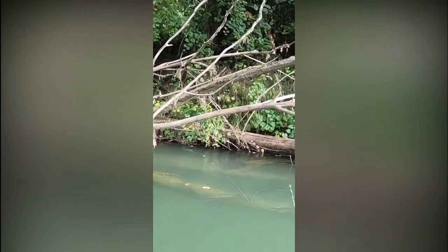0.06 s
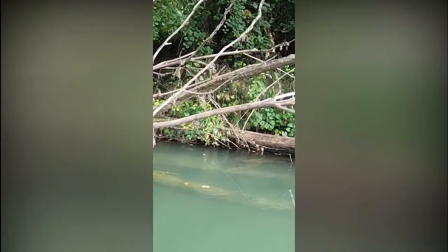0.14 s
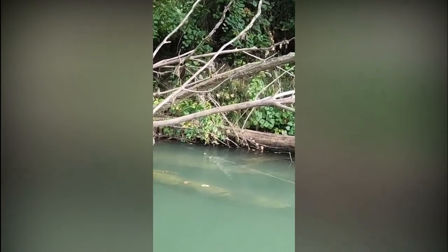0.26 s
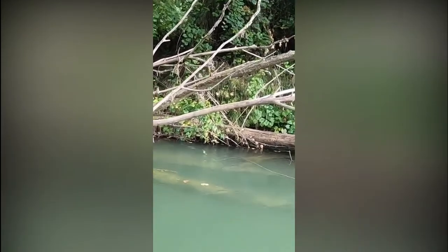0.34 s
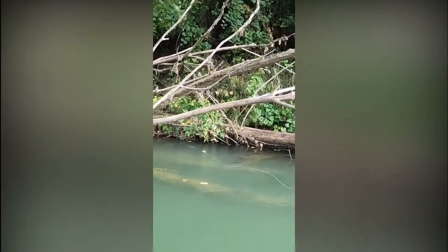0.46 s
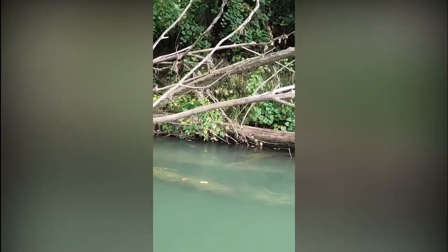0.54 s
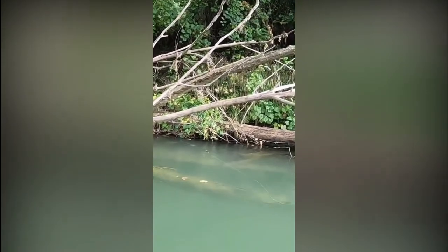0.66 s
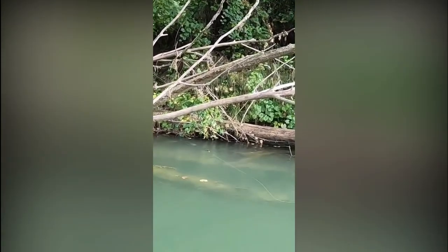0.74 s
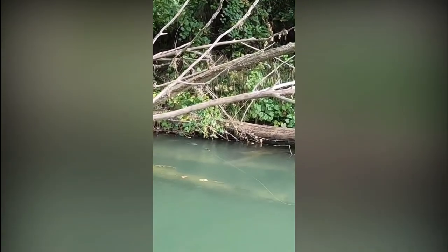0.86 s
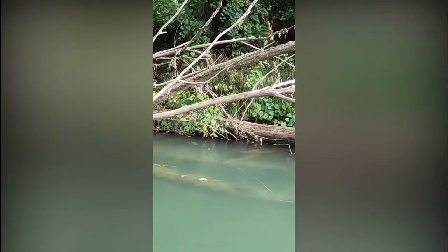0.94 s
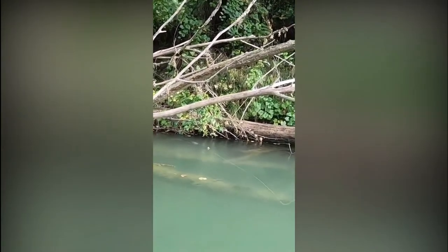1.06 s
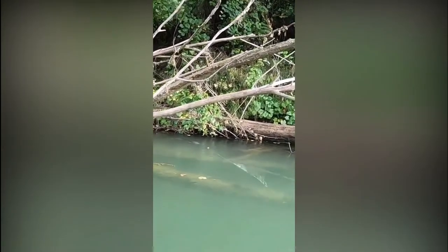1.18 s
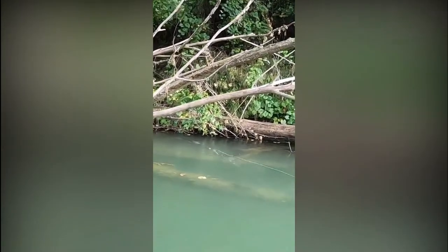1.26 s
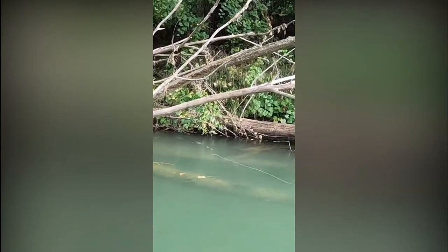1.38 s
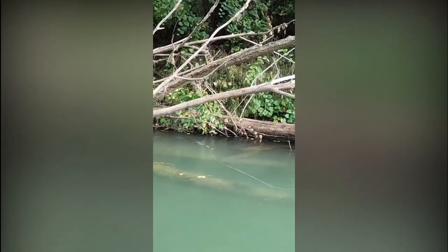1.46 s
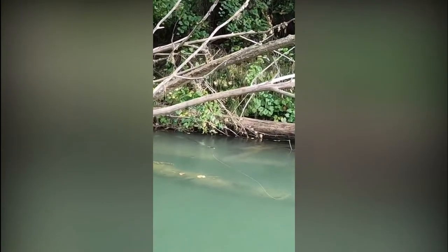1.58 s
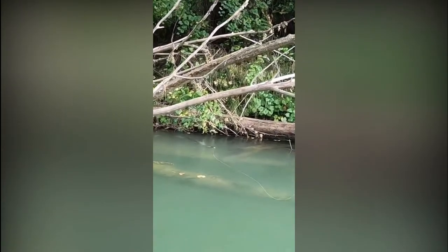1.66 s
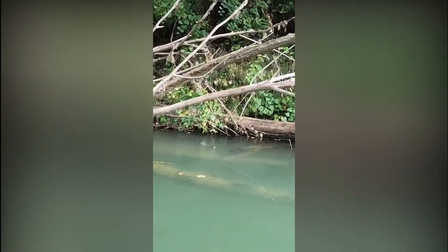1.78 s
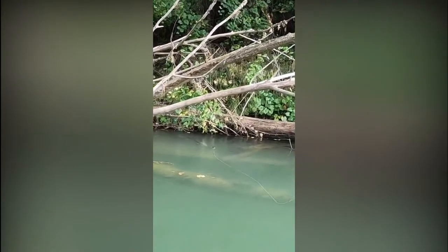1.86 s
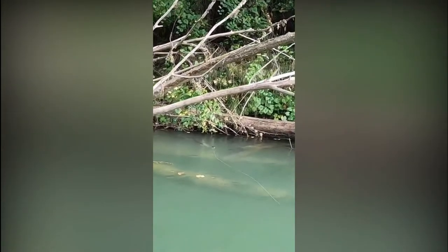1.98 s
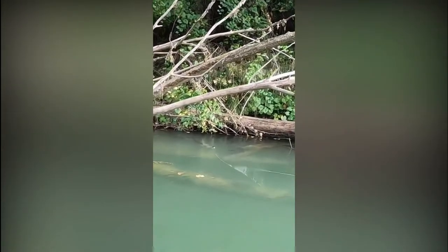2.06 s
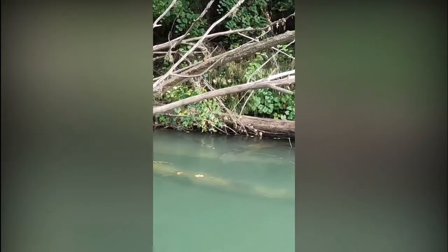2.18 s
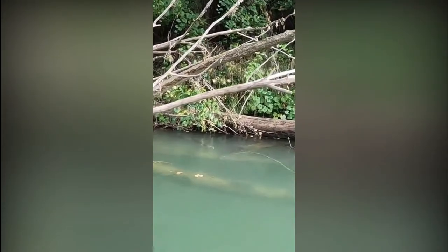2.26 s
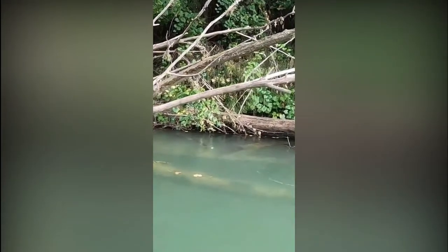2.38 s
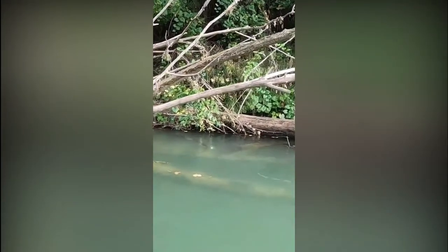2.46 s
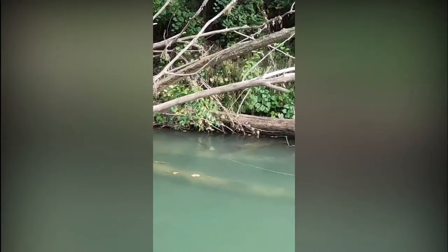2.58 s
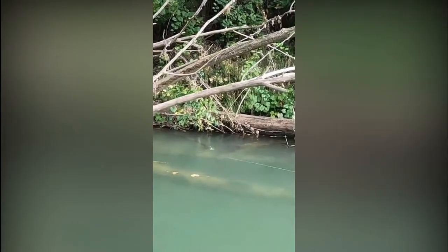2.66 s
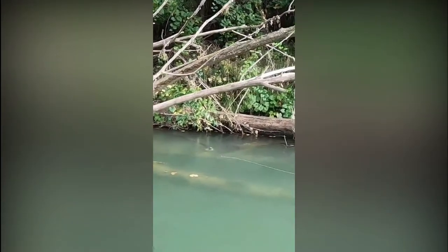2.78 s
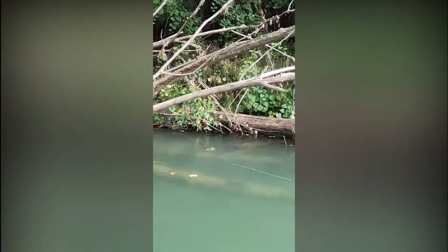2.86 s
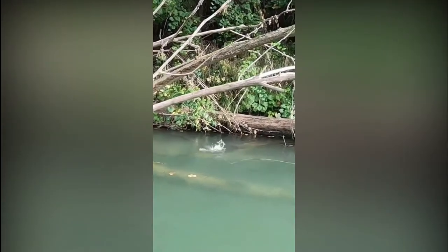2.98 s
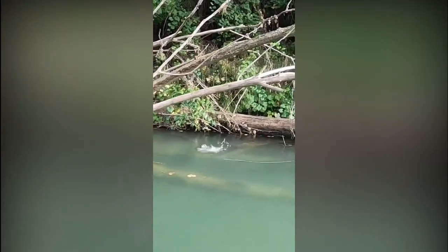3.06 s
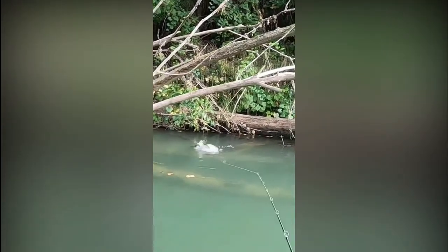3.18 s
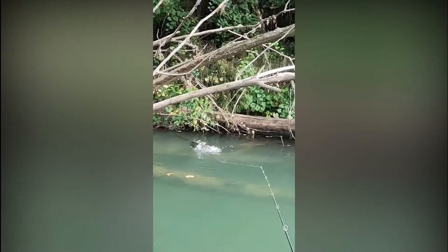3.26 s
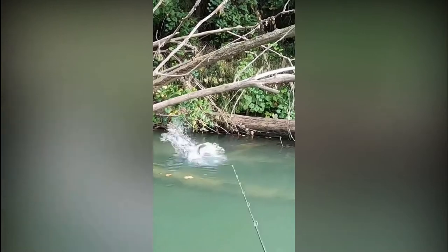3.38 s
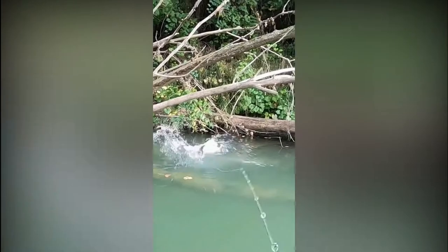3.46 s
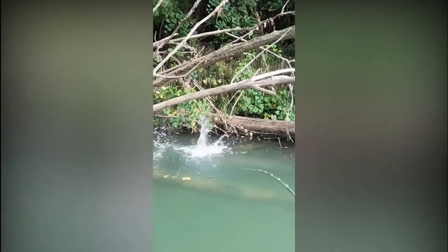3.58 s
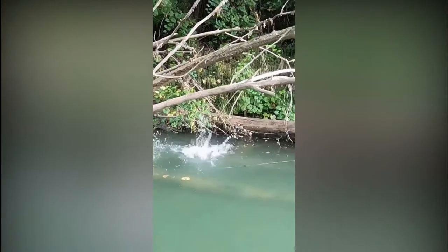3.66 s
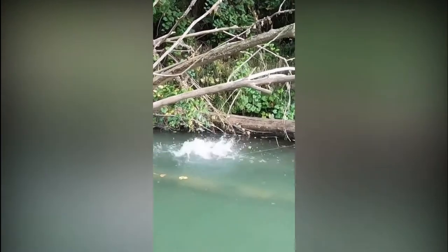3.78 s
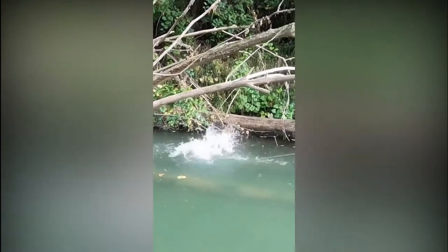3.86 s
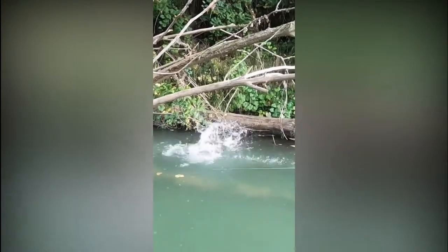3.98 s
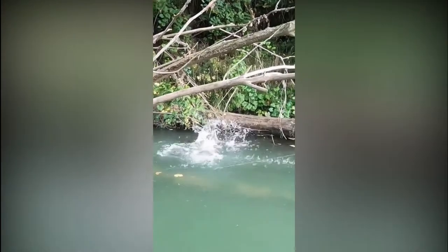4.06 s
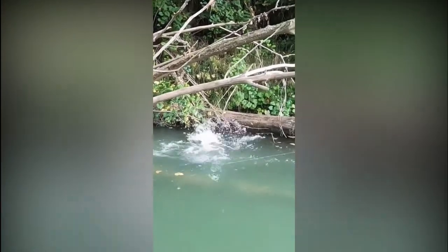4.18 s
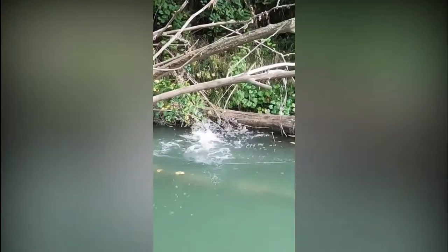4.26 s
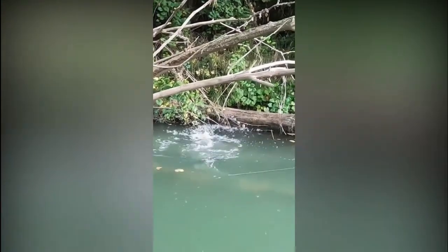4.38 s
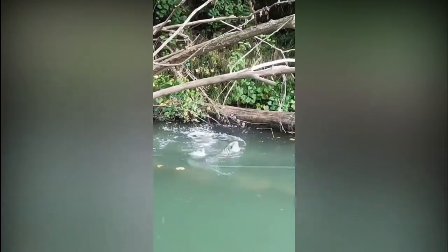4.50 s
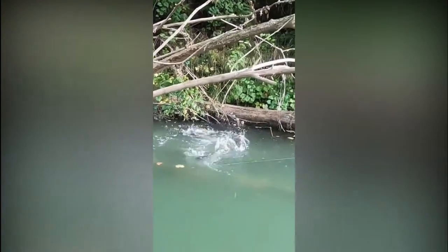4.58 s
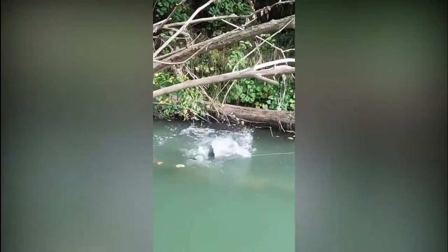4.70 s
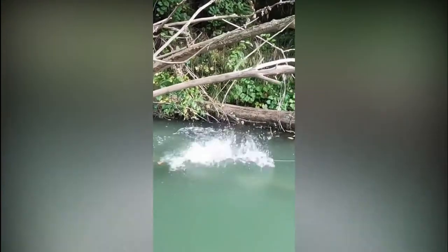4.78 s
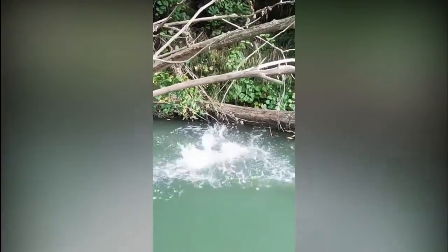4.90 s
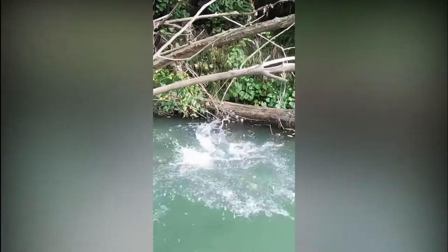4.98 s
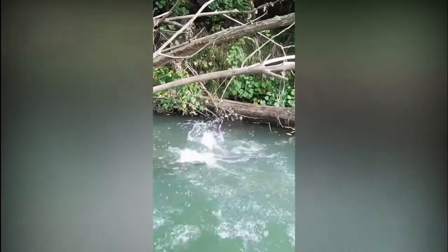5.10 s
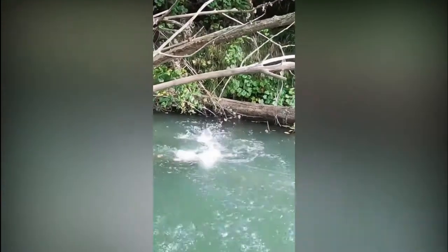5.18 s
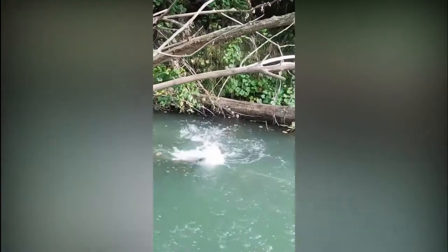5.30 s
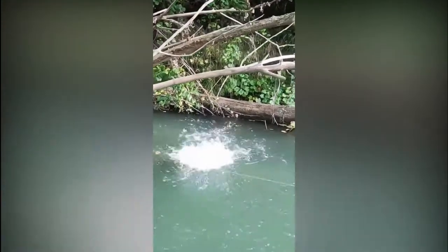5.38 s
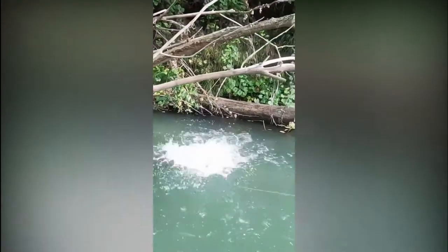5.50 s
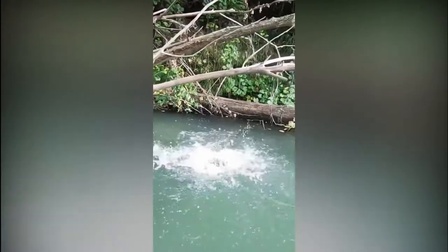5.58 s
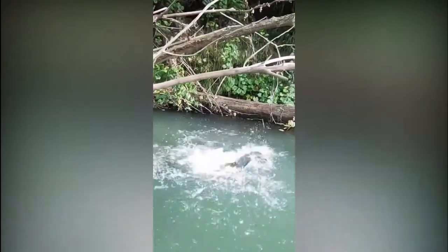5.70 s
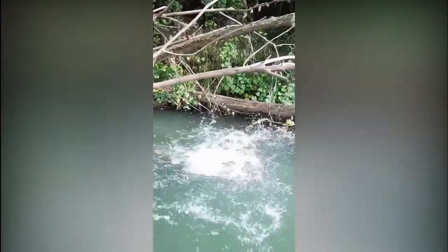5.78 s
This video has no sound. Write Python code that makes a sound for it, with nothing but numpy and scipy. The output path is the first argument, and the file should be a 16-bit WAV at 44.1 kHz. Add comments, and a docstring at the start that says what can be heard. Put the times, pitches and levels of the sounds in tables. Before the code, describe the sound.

A hushed riverbank with small ticks and plops suddenly gives way to a fish thrashing, slapping and churning bubbly water until the end.

```python
"""A quiet river bank: steady river noise; tackle clicks and rustles, a bird whistles thinly (gliding sines),
the water swirls (filtered noise) and plops (short ringing tones).
At 3.08 s a hooked fish breaks the surface and thrashes: tail slaps are noise bursts, air gulps and groans
as gliding tones, bubbles churn and spray patters as clouds of damped resonances.
Puffs of low noise buffet the microphone; short echoes come from the bank."""
import sys
import numpy as np
from scipy import signal
from scipy.fft import rfft, irfft, next_fast_len
from scipy.io import wavfile
from scipy.ndimage import uniform_filter1d

SR = 44100
rng = np.random.default_rng(int(sys.argv[2]) if len(sys.argv) > 2 else 0)


def pcm_store(signal):
    """Save signal as 16-bit PCM."""
    levels = np.round(np.clip(np.atleast_2d(signal), -1, 1) * 32767)
    wavfile.write(sys.argv[1], SR, levels.astype(np.int16).T)


N = 257314
TIME = np.arange(N) / SR
PADDED = next_fast_len(N, real=True)
BINS_HZ = np.maximum(np.arange(PADDED // 2 + 1) * SR / PADDED, 1)
SURFACE_S, LEAP_S = 3.076, 3.56   # fish breaks the surface and rolls; then leaps


def from_db(db):
    """Decibels to gain."""
    return 10 ** (np.asarray(db) / 20)


def rms_one(x):
    """Scale to unit power."""
    return x / np.sqrt(np.mean(x ** 2) + 1e-20)


def in_time(rows):
    """One curve per column, joined by straight lines."""
    s, *columns = np.transpose(rows)
    return [np.interp(TIME, s, c) for c in columns]


def at_hz(points, hz):
    """Read a table on a log-frequency axis."""
    f, value = np.transpose(points)
    return np.interp(np.log(hz), np.log(f), value)


def cut(x, hz, kind, order=2):
    """Butterworth filter."""
    edges_hz = np.clip(hz, 10, .45 * SR)
    return signal.sosfilt(signal.butter(order, edges_hz, kind, fs=SR, output="sos"), x + 1e-18)


def drift(rate_hz):
    """Slow random curve of spread 1: noise through a double pole, drawn every 40 samples."""
    step = 40
    pole = np.exp(-2 * np.pi * rate_hz * step / SR)
    white = rng.standard_normal(N // step + 2002)
    slow = signal.lfilter([1], [1, -2 * pole, pole ** 2], white)[2000:]   # drop the settling
    return np.interp(np.arange(N) / step, np.arange(len(slow)), rms_one(slow))


def pan(left_minus_right_db):
    """Channel gains for a left minus right level."""
    return from_db(np.array([[.5], [-.5]]) * left_minus_right_db)


def noise(colour, likeness):
    """Stereo noise with a given spectrum and left-right likeness (-1..1)."""
    mid, side = rfft(rng.standard_normal((2, PADDED)))
    c = np.clip(likeness, -1, 1)
    both = np.sqrt(1 + c) * mid + np.sqrt(1 - c) * side * [[1], [-1]]
    return rms_one(irfft(both * from_db(at_hz(colour, BINS_HZ)), PADDED)[:, :N])


def burst(t, swell_s, decay_s):
    """Exponential envelope that swells up to t = 0 and dies away."""
    return np.exp(-np.minimum(np.maximum(-t / swell_s, t / decay_s), 40))


def surges(rows, bed_db=-120, lag_s=0):
    """Gain of rounded swells (t/s, level/dB, length/s) over a bed; their powers add."""
    rise_share = 0.64   # rise time over fall time
    power = from_db(bed_db) ** 2
    for s, db, length_s in rows:
        age = (TIME - s - lag_s) / length_s
        age = np.where(age < 0, age / rise_share, age)
        power = power + from_db(db) ** 2 * np.exp(-2 * np.minimum(age ** 2, 20))
    return np.sqrt(power)


def glide(track, waver, flutter_db, rate_hz):
    """A sine along a (t/s, f/Hz, level/dB) track, wavering in pitch and level."""
    hz, db = in_time(track)
    inside = (TIME > track[0][0]) & (TIME < track[-1][0])
    gate = uniform_filter1d(1. * inside, size=300)
    phase = 2 * np.pi * np.cumsum(hz * (1 + waver * drift(rate_hz))) / SR
    gain = from_db(db + flutter_db * drift(rate_hz))
    return np.sqrt(2) * gate * gain * np.sin(phase)


# river spectrum: f/Hz, density/(dB per Hz)
RIVER_COLOUR = [(15, -28), (25, -12.5), (59, -4.5), (116, -21.5), (136, -1), (188, 2), (221, -2.5),
                (399, -11.5), (482, -14.5), (684, -6.5), (804, -3.5), (1080, -9.5), (1300, -6.5),
                (2630, -22.5), (15500, -38.5)]
# left-right likeness of the far river: f/Hz, likeness/(-1..1)
RIVER_LIKENESS = [(60, 0.54), (130, 0.093), (290, 0.12), (640, -0.48), (1400, -0.34), (3100, .2),
                  (7000, -0.24)]


def river():
    """Far flowing water: wide coloured noise, nearly steady in level."""
    level_db = -59.5 + .5 * drift(2.0)
    return from_db(level_db) * noise(RIVER_COLOUR, at_hz(RIVER_LIKENESS, BINS_HZ)) * pan(-0.984)


# rumble of air on the microphone: f/Hz, density/(dB per Hz)
WIND_COLOUR = [(20, 6), (45, 6.5), (70, -3), (130, -32.5)]
# puffs of air during the fight: t/s, level/dB
PUFFS = [(3.125, -57), (3.82, -45), (3.94, -40.5), (4.465, -44), (4.72, -52), (4.98, -45), (5.15, -46),
         (5.28, -43), (5.76, -37)]


def wind():
    """Air buffets the microphone as low noise: short puffs, over a bed once the fish has leapt."""
    puff_s, breeze_db = 0.065, -54
    bed_db = np.where(TIME > LEAP_S, breeze_db, -120)
    puffs = surges([(s, db, puff_s) for s, db in PUFFS], bed_db)
    return puffs * noise(WIND_COLOUR, 0.23) * pan(-2.5)


# thin whistles, one track each: t/s, f/Hz, relative level/dB
BIRD = [
    [(.19, 5470, -77), (.3, 5540, -84), (.39, 5520, -86)],
    [(.65, 7330, -81), (.70, 7030, -70), (.80, 6900, -67), (1.05, 6780, -69.5), (1.16, 6600, -65.5),
     (1.21, 6630, -78), (1.36, 6680, -86)],
    [(1.31, 4040, -71), (1.37, 4450, -76), (1.44, 4450, -72), (1.50, 4120, -84), (1.59, 4430, -86)],
    [(2.10, 4260, -83), (2.19, 4330, -73), (2.25, 4340, -77)],
]


def bird():
    """Thin whistles: single sines that glide and flutter."""
    whistles = sum(glide(track, waver=0.0083, flutter_db=6.5, rate_hz=113) for track in BIRD)
    return from_db(-9.0) * whistles * pan(-8.0)


# swirl spectrum: f/Hz, density/(dB per Hz)
SWIRL_COLOUR = [(200, -18), (400, -4.5), (560, -2), (900, -11), (1350, -1.5), (2200, -9), (5000, -38)]
# soft swirls before the strike: t/s, level/dB, length/s
SWIRLS = [(1.36, -61, 0.23), (2.26, -61, 0.094)]


def swirls():
    """Turning water: coloured noise in rounded swells with a fluttering level."""
    return surges(SWIRLS) * from_db(2 * drift(42)) * noise(SWIRL_COLOUR, 0.31) * pan(-1.3)


# dry ticks of tackle and falling drops: t/s, level/dB, decay/s
CLICKS = [(0.0158, -19.5, 0.0048), (0.128, -46.5, 0.008), (0.403, -66, 0.0027), (0.452, -52, 0.0018),
          (0.475, -54, 0.001), (1.0157, -51, 0.0023)]
# click spectrum: f/Hz, density/(dB per Hz)
CLICK_COLOUR = [(80, -47.5), (150, -31), (360, -7), (520, -5), (720, 6), (950, -13.5), (1400, 0.5),
                (1850, -2), (2050, 13.5), (2250, 8.5), (2550, -2), (4400, -2.5), (5300, 4), (6400, 6.5),
                (7600, 3), (9000, -5), (11000, -20), (15000, -34)]
# rod twitches, each a soft rustle: t/s, level/dB, length/s
TWITCHES = [(.055, -52, 0.077), (.47, -62, 0.12), (1.41, -58, 0.049), (2.275, -61.5, 0.08)]
# rustle spectrum: f/Hz, density/(dB per Hz)
RUSTLE_COLOUR = [(240, -24), (400, -8.5), (854, -4.5), (1290, -13), (2150, -6.5), (2830, -9), (5430, -9),
                 (7810, -14), (15000, -43)]


def tackle():
    """Close on the right: clicks are abrupt noise bursts, rod twitches are rustling noise swells."""
    handling_db = -73   # faint rustle between twitches
    click_gain = sum(from_db(db) * burst(TIME - s, 0.000128, decay_s) for s, db, decay_s in CLICKS)
    clicks = click_gain * noise(CLICK_COLOUR, 0.17)
    rustle_gain = surges(TWITCHES, handling_db) * from_db(2.3 * drift(110))
    rustle = rustle_gain * noise(RUSTLE_COLOUR, 0.33)
    return clicks * pan(-12.5) + rustle * pan(-3.5)


# air cavities opening and closing, one track each: t/s, f/Hz, level/dB
CAVITIES = [
    [(1.485, 528, -56), (1.5, 783, -45.5), (1.522, 1270, -62)],
    [(3.105, 130.2, -29), (3.116, 96, -33), (3.14, 117, -38), (3.18, 103, -47), (3.22, 133, -53),
     (3.252, 240, -40), (3.272, 433, -46), (3.29, 366, -55)],
    [(3.29, 141.9, -44), (3.33, 162, -52), (3.38, 187, -51), (3.41, 258, -61)],
    [(3.79, 70, -52), (3.825, 79, -48), (3.86, 75, -54)],
    [(4.105, 403, -32), (4.125, 270, -46), (4.15, 247, -38), (4.175, 320, -47), (4.19, 470, -33)],
    [(4.26, 169.6, -47), (4.29, 124, -45), (4.33, 114, -54)],
    [(5.245, 92, -38), (5.27, 77.5, -40), (5.29, 89, -36.5), (5.34, 69, -48)],
    [(5.37, 84.3, -54), (5.40, 117, -34.5), (5.42, 140, -38)],
]


def cavities():
    """Air cavities groan or chirp: the pitch glides as they open and close."""
    return sum(glide(track, waver=.05, flutter_db=1.5, rate_hz=50) for track in CAVITIES)


# loudest single bubbles and drips: t/s, f/Hz, peak level/dB, time to peak/s
GULPS = [(.128, 625, -45, 0.0019), (.508, 2180, -54, 0.005), (.734, 1150, -53, 0.0013),
         (1.0163, 4460, -41.5, 0.00075), (1.0348, 1166, -38.5, 0.0017), (1.0345, 447, -47.5, 0.0009),
         (1.0585, 3440, -43, 0.00072), (2.238, 590, -55, 0.0052), (2.309, 576, -51, .003),
         (2.379, 2080, -54, 0.0018), (3.05, 196, -47, 0.0093), (3.0885, 885, -18, 0.00071),
         (3.100, 238, -26.5, 0.0032), (3.191, 577, -26.5, .0025), (3.210, 954, -32, 0.004),
         (3.255, 3570, -23, 0.00088), (3.274, 767, -31, 0.0036), (3.292, 398, -33.5, 0.0041),
         (3.3995, 5800, -35.5, 0.001), (3.433, 724, -28, 0.0023), (3.532, 224, -42.5, 0.011),
         (3.5625, 650, -20, 0.0011), (3.688, 893, -22.5, 0.0023), (3.698, 950, -26, 0.0024),
         (3.758, 740, -29.5, 0.0041), (3.89, 558, -20.5, .003), (3.9362, 960, -9.5, 0.00073),
         (3.938, 261, -24, 0.0039), (4.11, 882, -23.5, 0.0025), (4.227, 442, -22.5, 0.0038),
         (4.256, 226.5, -26, 0.0051), (4.457, 590, -22, 0.0007), (4.460, 205, -18, 0.0038),
         (4.791, 986, -21, 0.001), (4.841, 620, -30.5, 0.0018), (4.956, 620, -13.5, 0.0031),
         (5.003, 980, -23.5, 0.006), (5.443, 720, -26, 0.0024), (5.481, 296, -21.5, 0.004),
         (5.496, 400, -20.5, 0.0027), (5.601, 4020, -23, 0.0026), (5.659, 740, -24, 0.002),
         (5.703, 705, -24, 0.003), (5.706, 183, -28, 0.011)]
# small bubbles rise in pitch, large pockets sink: f/Hz, glide/octaves
GULP_GLIDE = [(200, -0.63), (450, -0.11), (700, 0.089)]


def gulps():
    """Trapped air rings as a short tone that glides while the bubble changes shape and depth."""
    roughness = 0.115   # rms share of pitch
    out, t = np.zeros(N), np.arange(SR // 8) / SR
    for s, hz, db, peak_s in GULPS:
        age = t / peak_s
        wobble = rms_one(cut(rng.standard_normal(len(t)), hz / 4, "low"))
        bend = 2 ** (at_hz(GULP_GLIDE, hz) * np.tanh(age / 4))
        pitch_hz = hz * bend * (1 + roughness * wobble)
        envelope = age * np.exp(1 - age)
        tone = from_db(db) * envelope * np.sin(2 * np.pi * np.cumsum(pitch_hz) / SR)
        i = int(s * SR)
        out[i:i + len(t)] += tone[:N - i]
    return out


# stereo width of slaps and bubbles: f/Hz, spread/(0..1)
SPREAD = [(100, 0.38), (330, 0.061), (700, 0.23), (1400, 0.51), (3100, 0.052), (7000, 0.49), (14000, 0.28)]
# slap spectrum: f/Hz, density/(dB per Hz)
SLAP_COLOUR = [(150, -29), (500, -6), (1000, 2), (1600, -2), (2700, 4.5), (5000, -2.5), (7800, -4),
               (11000, -23.5), (15000, -27)]
# water sheets hit by tail and body: t/s, level/dB, swell/s, decay/s
SLAPS = [(3.089, -25.5, .00065, 0.0033), (3.104, -25.5, .0099, 0.0068), (3.196, -30.5, 0.0041, .021),
         (3.2763, -33, .001, 0.0061), (3.565, -36, 0.031, .0048), (3.592, -18, 0.0099, 0.0079),
         (3.819, -31, 0.0021, 0.005), (3.9322, -22, 0.00051, 0.0013), (3.937, -12.5, 0.00069, 0.0018),
         (4.133, -26.5, .001, 0.0019), (4.237, -30, 0.019, 0.023), (4.5596, -17.5, 0.00046, 0.0013),
         (4.566, -26, .0012, .0017), (4.843, -28.5, 0.0032, 0.0065), (4.915, -29, .0086, 0.012),
         (4.959, -31, 0.037, 0.036), (5.017, -29.5, 0.0072, 0.029), (5.487, -28, 0.0034, 0.052),
         (5.601, -28.5, 0.006, 0.017), (5.712, -35, .0073, 0.019), (5.742, -24, 0.00044, 0.0021),
         (5.753, -19.5, 0.0095, 0.0063)]


def slaps():
    """A sheet of water tears into a dense crackle of noise; harder blows are brighter."""
    bright_hz, usual_db, db_per_octave = 3970, -29, 5.5   # low-pass corner at the usual level
    out = np.zeros((2, N))
    crackle = noise(SLAP_COLOUR, np.cos(np.pi * at_hz(SPREAD, BINS_HZ) / 2))
    for s, db, swell_s, decay_s in SLAPS:
        corner_hz = bright_hz * 2 ** ((db - usual_db) / db_per_octave)
        span = slice(int((s - .1) * SR), int((s + .2) * SR))
        sheet = rms_one(cut(crackle[:, span], corner_hz, "low", order=1))
        out[:, span] += from_db(db) * burst(TIME[span] - s, swell_s, decay_s) * sheet
    return out * (TIME > SURFACE_S)


# colour of the bubbling water: f/Hz, density/(dB per Hz)
WATER = [(41, -36), (70, -6), (108, -30), (161, 0), (278, 3.5), (333, -12.5), (427, -1.5), (572, -4.5),
         (1010, -4.5), (1620, -6), (2220, 0), (3490, -4), (7350, -12), (13500, -34), (15500, -50)]


def grains(low_hz, high_hz, per_s, cycles, size_db, clump_db, count):
    """Bubbles of many sizes born at random and in clumps; each rings from its own place.

    per_s: births before clumping, all bands; cycles: ring length to -60 dB; count: pitch bands.
    """
    first = int(SURFACE_S * SR)
    out = np.zeros((2, N - first))
    birth_chance = per_s / count / SR * from_db(clump_db * drift(35)[first:])
    for hz in np.geomspace(low_hz, high_hz, count):
        at = np.flatnonzero(rng.random(N - first) < birth_chance)
        size, side, sign = rng.random((3, len(at)))
        height = from_db(size_db * np.minimum(-np.log(size), 4)) * np.sign(sign - .5)
        turn = (side - .5) * np.pi * at_hz(SPREAD, hz)   # path difference as a phase angle
        births = np.full(out.shape, 1e-18, complex)
        births[:, at] = height * np.exp(1j * turn * np.array([[1], [-1]]))
        pole = from_db(-60 * hz / (cycles * SR)) * np.exp(2j * np.pi * hz / SR)
        rings = signal.lfilter([1], [1, -pole], births).imag
        rings = cut(rings, [hz / 2, hz * np.sqrt(2)], "band", order=1)
        out += rms_one(rings) * from_db(at_hz(WATER, hz)) * np.sqrt(hz)   # bandwidth grows with pitch
    return np.pad(rms_one(out), [(0, 0), (first, 0)])


# how hard the fish churns, which drives the spray: t/s, effort/dB
EFFORT = [(3.08, -29.5), (3.11, -30.5), (3.16, -37), (3.3, -39), (3.39, -43.5), (3.52, -39.5),
          (3.62, -37.5), (3.8, -36.5), (4.1, -35.5), (4.31, -38.5), (4.55, -34.5), (4.67, -37.5),
          (4.82, -38), (4.98, -33), (5.17, -31), (5.42, -36.5), (5.66, -34.5), (5.79, -32.5)]
# body strokes that drag air under: t/s, bubble level/dB, large pocket level/dB, length/s
STROKES = [(3.106, -32, -50, 0.01), (3.2, -46, -44, 0.017), (3.283, -34.5, -46, 0.016),
           (3.435, -31, -41.5, 0.014), (3.481, -34, -69, 0.034), (3.563, -34, -43, 0.051),
           (3.678, -37, -67, 0.062), (3.848, -34.5, -53, 0.1), (3.94, -36, -31, 0.034),
           (4.101, -35.5, -51, 0.024), (4.228, -33, -40.5, 0.032), (4.496, -69, -37, 0.018),
           (4.53, -42, -44, 0.025), (4.882, -35, -67, 0.025), (4.993, -28.5, -48, 0.08),
           (5.095, -32, -36.5, 0.069), (5.215, -35.5, -41, 0.07), (5.385, -37, -40.5, 0.06),
           (5.477, -28.5, -30.5, 0.037), (5.587, -32.5, -45, 0.13), (5.733, -29.5, -33.5, 0.11)]


def churn():
    """Strokes set bubbles popping and large pockets burbling; spray and ringing drops follow the effort."""
    usual_db = -36   # ordinary effort
    pocket_bed_db, pocket_follows = -54, 1.6   # between strokes at ordinary effort; dB per dB of effort
    bubble_bed_db, bubble_follows = -42.5, 0.64
    effort_db, = in_time(EFFORT)
    extra_db = effort_db - usual_db
    s, bubble_db, pocket_db, length_s = np.transpose(STROKES)
    pocket_bed = pocket_bed_db + pocket_follows * extra_db
    pocket_gain = surges(zip(s, pocket_db, length_s), pocket_bed, lag_s=0.0081)   # close after the bubbles
    bubble_bed = bubble_bed_db + bubble_follows * extra_db
    bubble_gain = surges(zip(s, bubble_db, length_s), bubble_bed)

    pockets = grains(109, 289, per_s=280, cycles=12, size_db=6, clump_db=4, count=6)
    bubbles = grains(302, 1352, per_s=1000, cycles=14.1, size_db=0.5, clump_db=2, count=16)
    coarse = grains(1500, 4300, per_s=2200, cycles=17, size_db=3.7, clump_db=2.5, count=12)
    mist = grains(5020, 11900, per_s=6500, cycles=2.4, size_db=0, clump_db=2, count=9)
    drops = grains(1500, 8000, per_s=260, cycles=50, size_db=3, clump_db=2, count=30)

    mist_db = -3 + 0.44 * extra_db - 3 * (TIME < LEAP_S)   # less mist while only rolling
    spray = from_db(-2) * coarse + from_db(mist_db) * mist + from_db(-7) * drops
    patter = from_db(effort_db - 2.5) * cut(spray, 8950, "low", order=3)
    breach = np.clip((TIME - SURFACE_S) / 0.016, 0, 1)   # build-up as the surface breaks
    under = pocket_gain * pockets + bubble_gain * bubbles
    return breach ** 3 * under + np.sqrt(breach) * patter


def ground_bounce(x, lag_s, share):
    """A second path off the near shore arrives just after the direct one and combs the spectrum."""
    late = np.array([np.interp(TIME - lag_s, TIME, channel) for channel in x])
    return (x + share * late) / np.sqrt(1 + share ** 2)


# splashes between the ears: f/Hz, left minus right/dB
BALANCE = [(110, -1), (380, -.5), (700, -5.5), (1290, -3.5), (2380, -2), (4400, -3.8), (8120, -5),
           (13000, 1)]


def mostly_right(x):
    """Splashes lean to the right over most of the range, by an amount that depends on pitch."""
    return irfft(rfft(x, PADDED) * pan(at_hz(BALANCE, BINS_HZ)), PADDED)[:, :N]


def bank(x, t60_s, dull_hz):
    """Branches and the far bank scatter a short dull tail, different at each ear."""
    t = np.arange(SR // 2) / SR
    scatter = cut(rng.standard_normal((2, len(t))), dull_hz, "low", order=1)
    scatter = scatter * from_db(-60 * t / t60_s) * (t > .004)
    scatter = scatter / np.sqrt(np.sum(scatter ** 2) / 2)
    return signal.fftconvolve(cut(x, 550, "high"), scatter, axes=1)[:, :N]


def scene():
    """The fish and the tackle over the quiet river."""
    whistles = bird()
    splashes = ground_bounce(churn() + slaps() + gulps(), lag_s=.00295, share=0.058)
    water = mostly_right(splashes + cavities())
    water_echo = from_db(-14.5) * bank(water, t60_s=0.096, dull_hz=5000)
    bird_echo = from_db(5.0) * bank(whistles, t60_s=0.63, dull_hz=8000)
    return river() + wind() + whistles + swirls() + tackle() + water + water_echo + bird_echo


def record(dry):
    """Steep low-pass: 70 dB down from 16.2 kHz."""
    return signal.sosfilt(signal.cheby2(16, 70, 16200, fs=SR, output="sos"), dry)


dry = scene()
out = record(dry)
pcm_store(out)
```